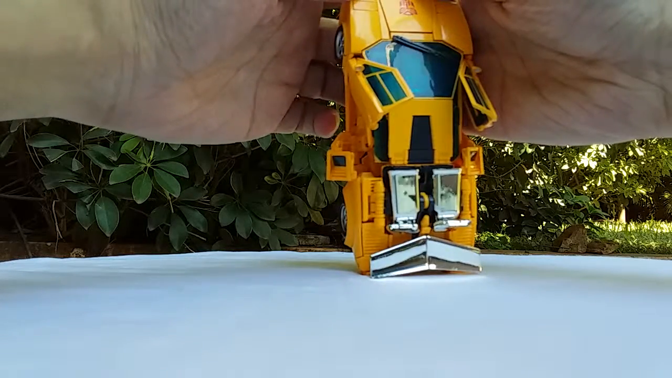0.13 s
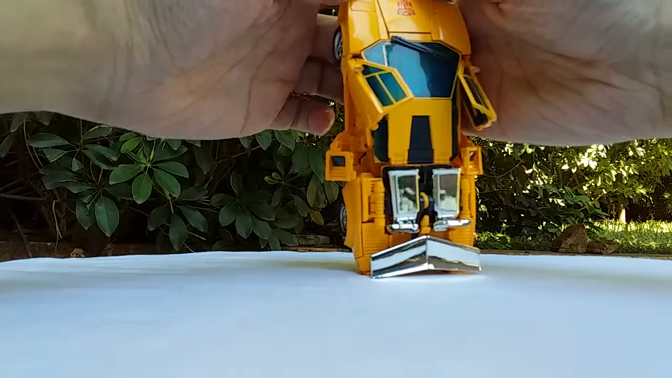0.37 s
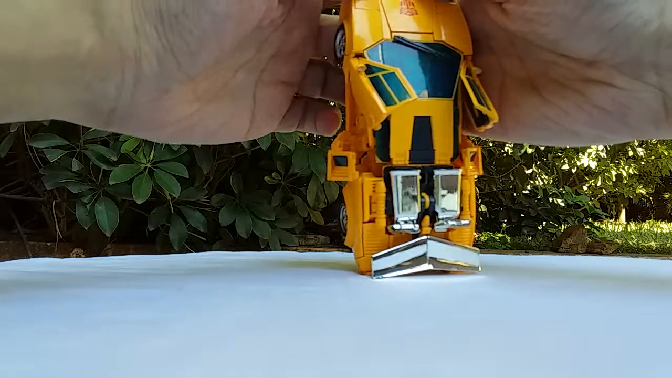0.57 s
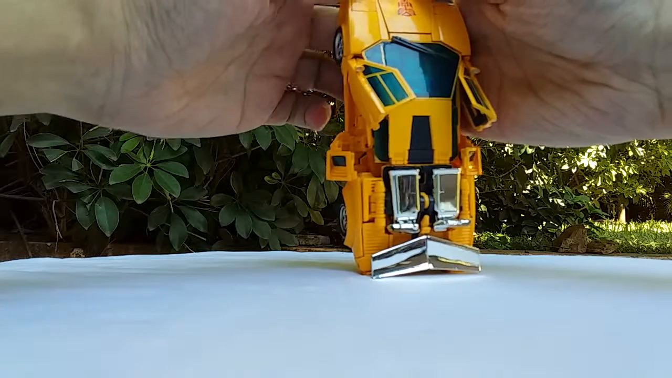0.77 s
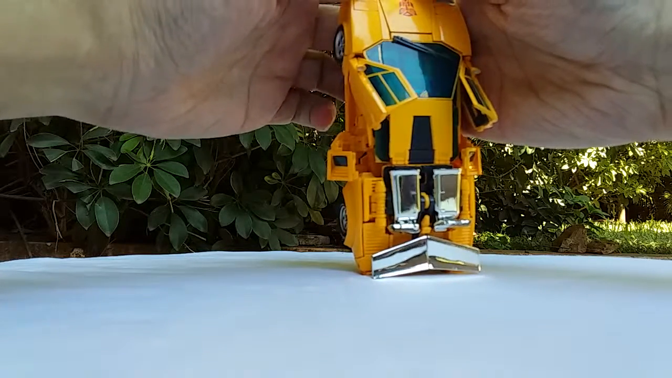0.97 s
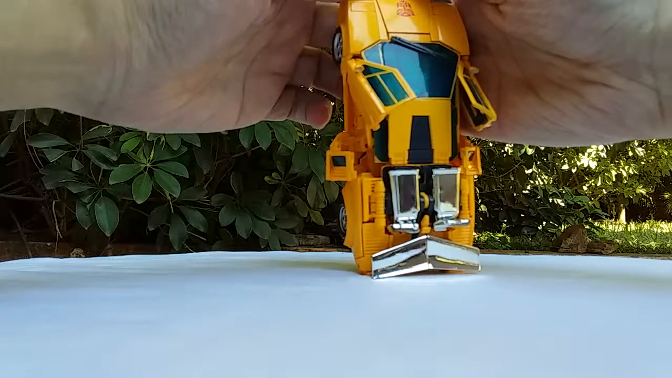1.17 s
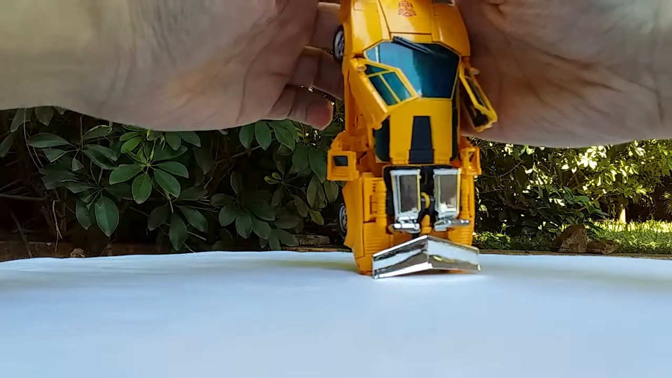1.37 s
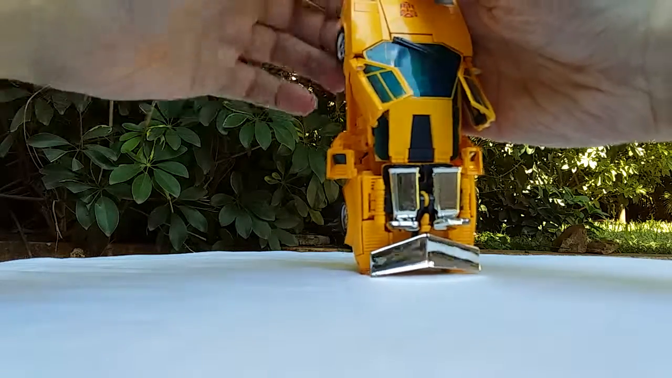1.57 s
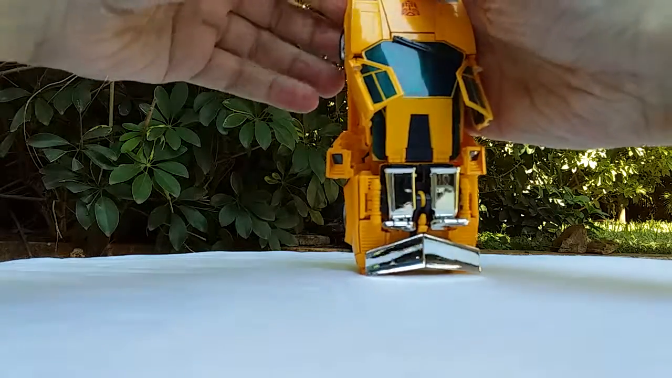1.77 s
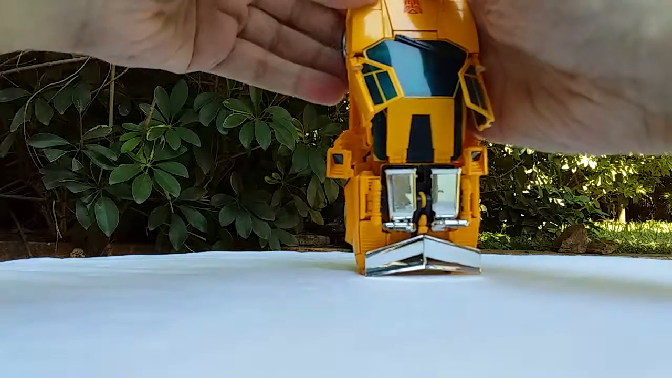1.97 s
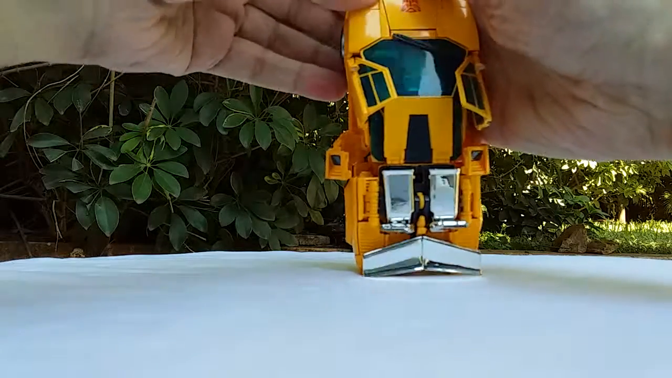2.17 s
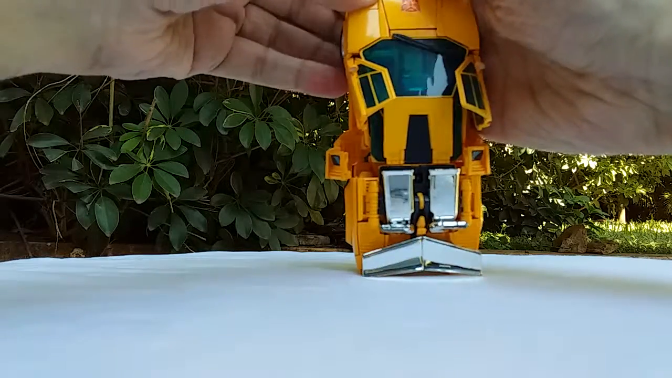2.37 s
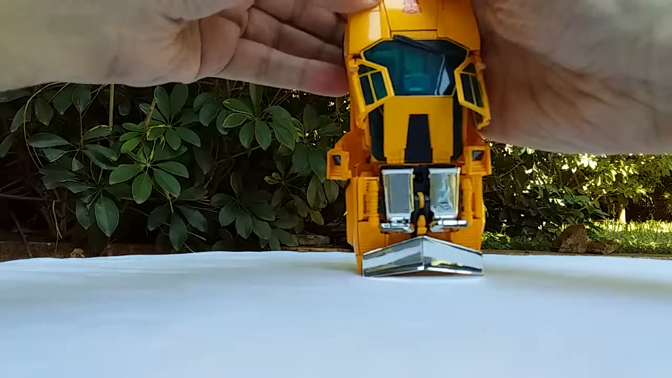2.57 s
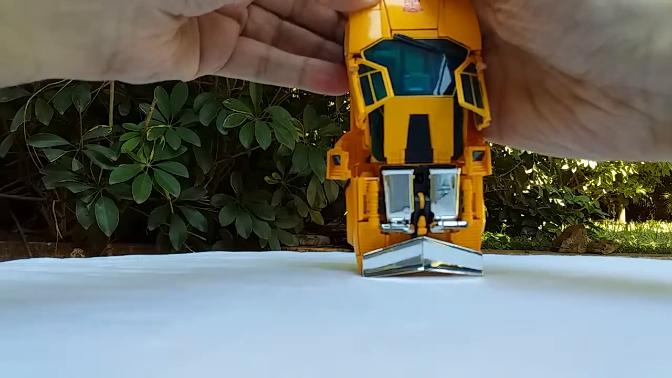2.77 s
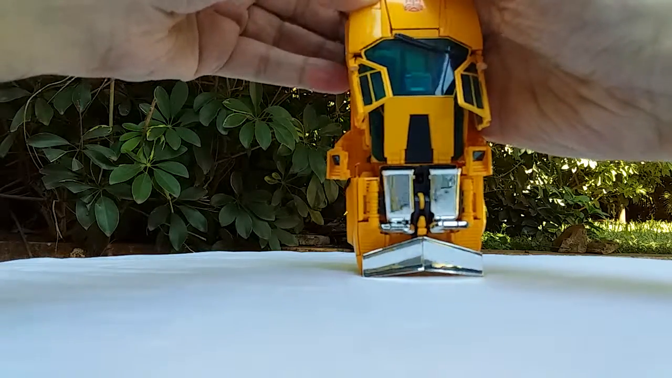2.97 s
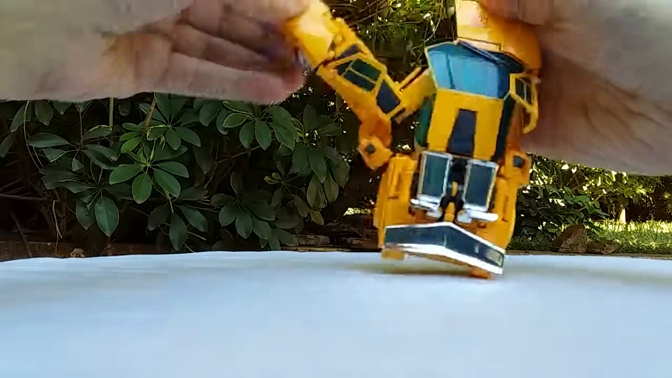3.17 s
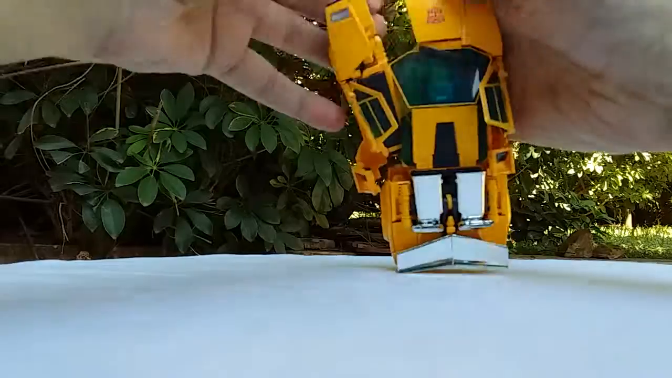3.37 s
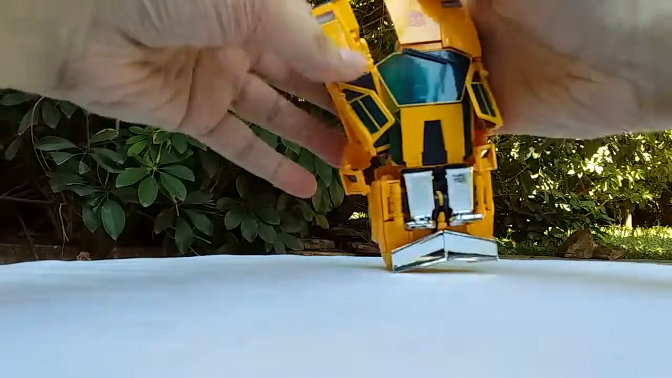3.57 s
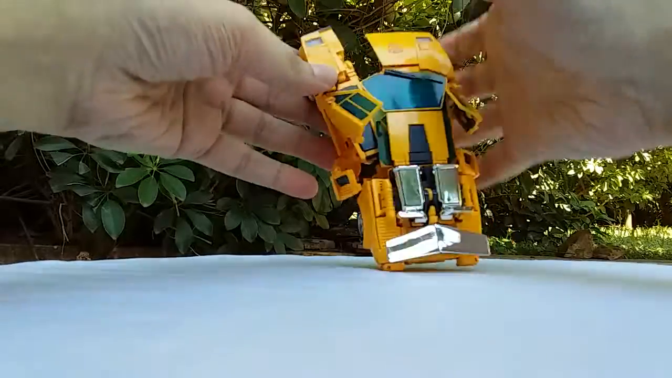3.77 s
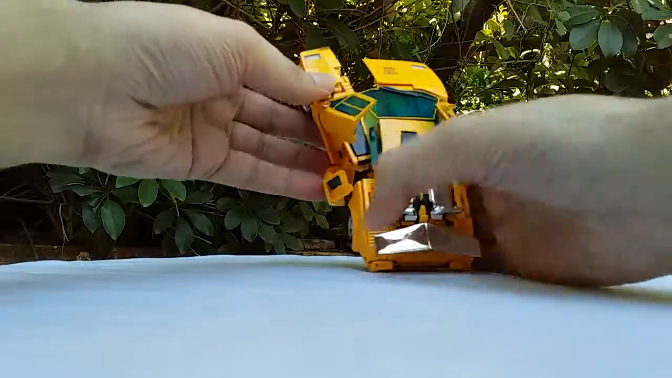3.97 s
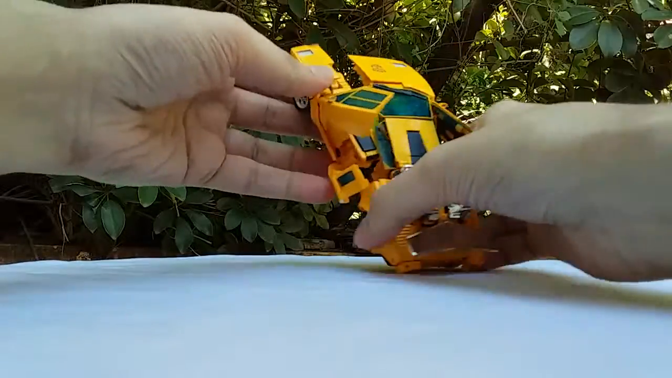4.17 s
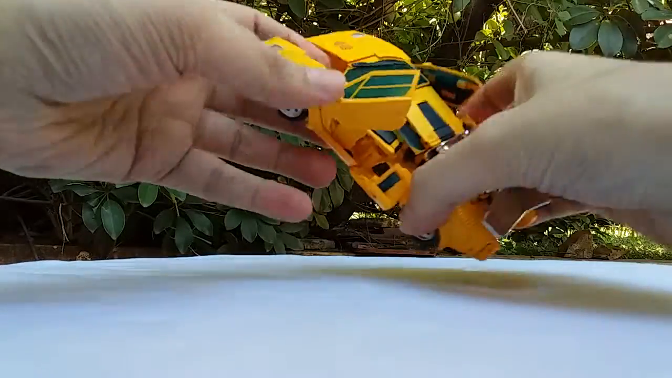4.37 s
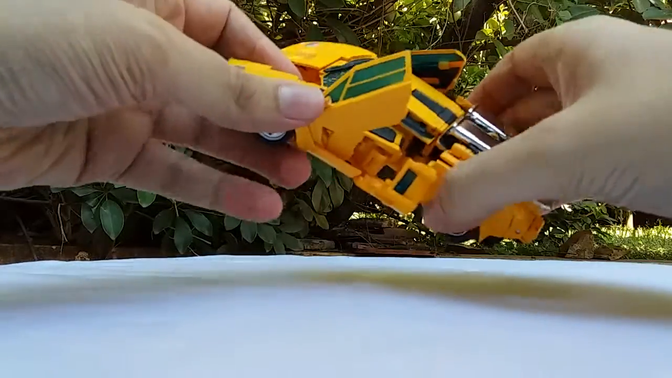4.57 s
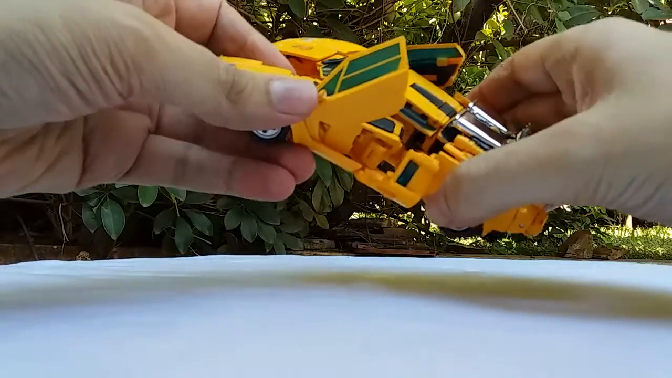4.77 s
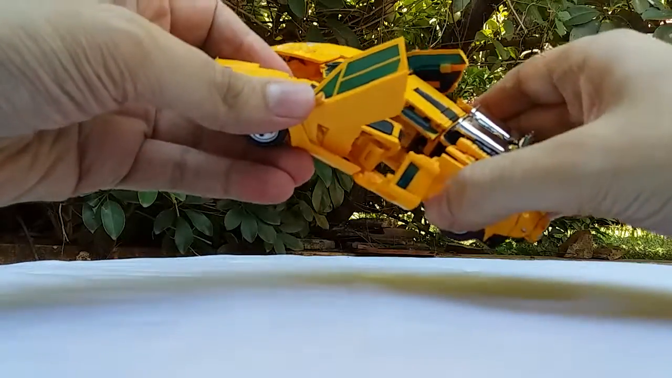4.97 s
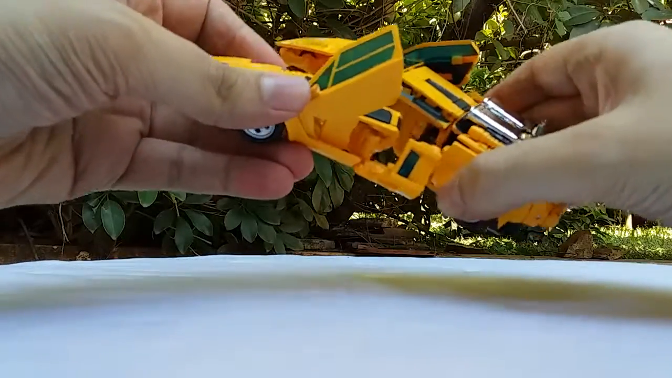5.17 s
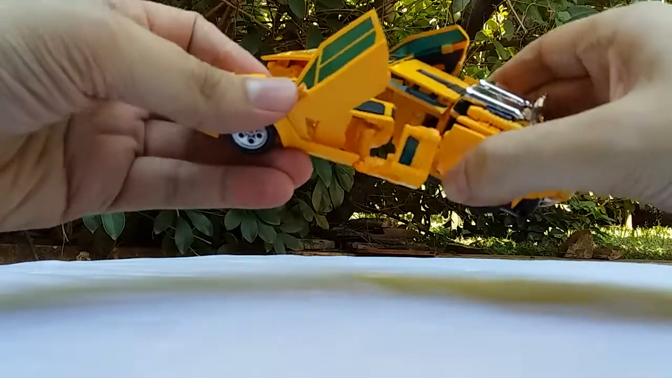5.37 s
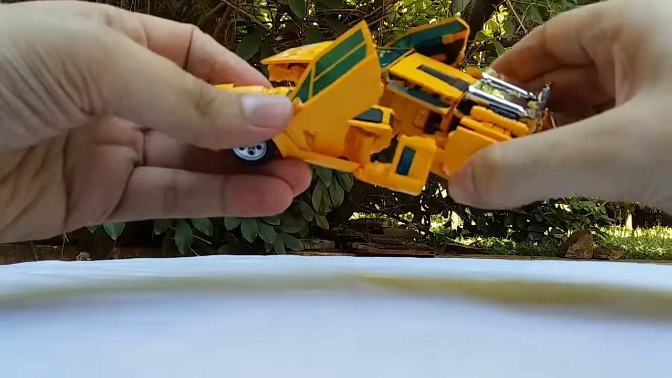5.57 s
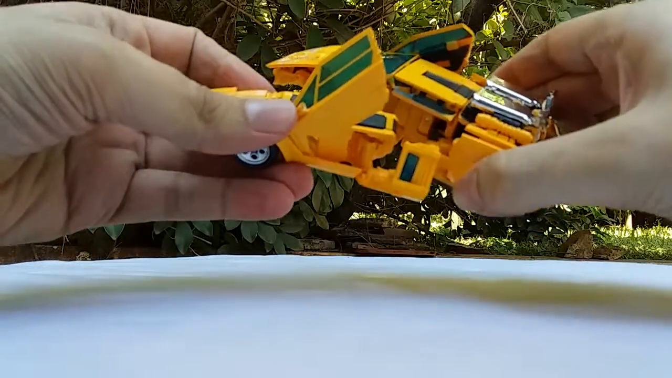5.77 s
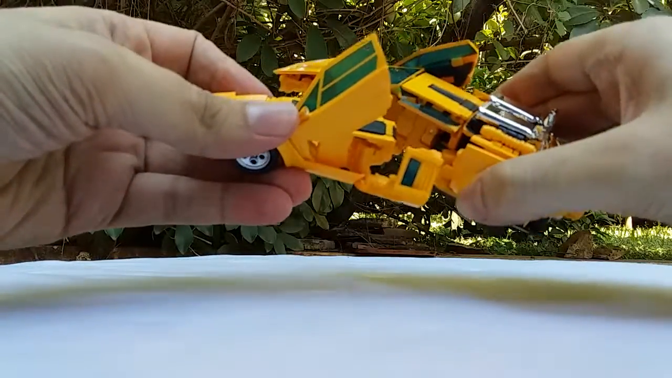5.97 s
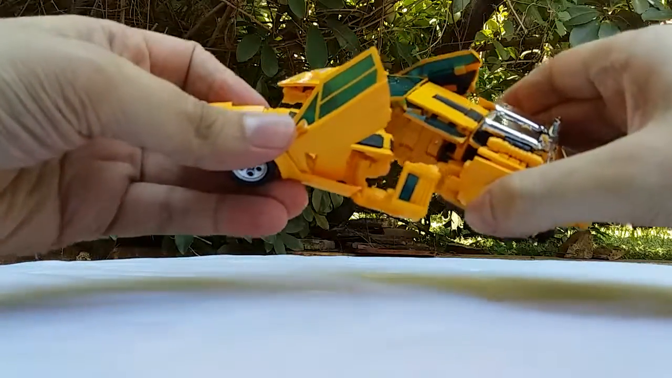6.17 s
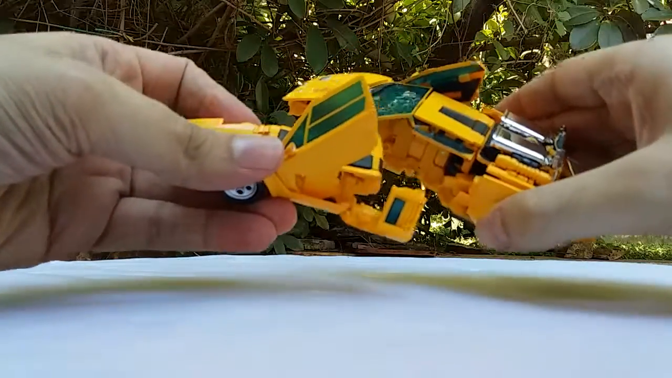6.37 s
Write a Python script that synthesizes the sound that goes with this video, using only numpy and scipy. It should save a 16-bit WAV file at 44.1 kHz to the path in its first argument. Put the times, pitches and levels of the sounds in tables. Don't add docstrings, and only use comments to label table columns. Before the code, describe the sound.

Plastic joints click and creak quietly, suddenly crack and rattle loudly against a table, then settle into light taps over faint traffic rumble.

```python
import sys
import numpy as np
from scipy import signal
from scipy.fft import rfft, irfft, next_fast_len
from scipy.io import wavfile
from scipy.ndimage import map_coordinates

SR = 44100
rng = np.random.default_rng(int(sys.argv[2]) if len(sys.argv) > 2 else 0)


def inscribe(sig):
    pcm = np.round(np.clip(np.atleast_2d(sig).T, -1, 1) * 32767)
    wavfile.write(sys.argv[1], SR, pcm.astype(np.int16))


def gain_from_db(level_db):
    decades = np.asarray(level_db, float) / 20
    return 10 ** decades


N = 283563


def unit(x):
    return x / np.sqrt(np.mean(x ** 2) + 1e-20)


def along(points, hz):
    point_hz, value = np.transpose(points)
    return np.interp(np.log(hz + 1), np.log(point_hz + 1), value)


def wobble(rate):
    knots = rng.standard_normal(int(N * rate / SR) + 4)
    return map_coordinates(knots, [np.arange(N) * rate / SR])


def filtered(x, response):
    size = next_fast_len(len(x) + 4096)
    spectrum = rfft(x, size) * response(np.fft.rfftfreq(size, 1 / SR))
    return irfft(spectrum, size)[:len(x)]


def resonances(modes):
    def response(f):
        total = 0
        for k, (hz, width, db) in enumerate(modes):
            total = total + (-1) ** k * gain_from_db(db) * 1j * f * width / (hz * hz - f * f + 1j * f * width)
        return total
    return response


def swells(rows):
    t = np.arange(N) / SR
    total = np.zeros(N)
    for s, hold, db, rise, fall in rows:
        before = np.clip(s - t, 0, None)
        after = np.clip(t - s - hold, 0, None)
        total += gain_from_db(db - rise * before - fall * after)
    return total


# (time [s], level [dB])
TRAFFIC_LEVEL = [(0, -55.5), (.9, -58.5), (2, -54.5), (2.8, -56.5), (3.5, -55.5), (3.8, -57), (4.1, -55),
                 (4.5, -58.5), (5.3, -56), (6.43, -56)]
# (frequency [Hz], level [dB per Hz])
RUMBLE_COLOUR = [(18, -33.5), (30, -14.5), (70, -4.5), (140, -0.5), (191, -3), (211, -10.5), (237, -7),
                 (385, -8.5), (415, -13), (446, -11.5), (494, -18.5), (779, -27), (1000, -35), (1300, -71),
                 (2200, -120)]
# (frequency [Hz], level [dB per Hz])
AIR_COLOUR = [(500, -16), (900, -5), (1320, 5), (1700, -2), (2400, -7), (4400, -6.5), (6500, -10),
              (10000, -12.5), (14000, -11), (15200, -7), (15850, -10), (16100, -38.5)]


def background():
    lumpy = rng.standard_normal(N) * gain_from_db(0.99 * wobble(25))
    rumble = unit(filtered(lumpy, lambda hz: gain_from_db(along(RUMBLE_COLOUR, hz))))
    time, level = np.transpose(TRAFFIC_LEVEL)
    traffic_db = np.interp(np.arange(N) / SR, time, level)
    rumble = gain_from_db(traffic_db + 0.57 * wobble(2.7)) * rumble

    drone_hz = 48 + 1.3 * wobble(3.8)
    drone = gain_from_db(-65.5 + 2.5 * wobble(7.1)) * np.sin(2 * np.pi * np.cumsum(drone_hz) / SR)

    air = unit(filtered(rng.standard_normal(N), lambda hz: gain_from_db(along(AIR_COLOUR, hz))))
    hiss = gain_from_db(-75.5 + 1.0 * wobble(1.4)) * air

    whine_hz = 14766 + 3 * wobble(4) + 7 * wobble(30)
    whine = gain_from_db(-73.0 + 0.95 * wobble(4.3)) * np.sin(2 * np.pi * np.cumsum(whine_hz) / SR)
    return rumble + drone + hiss + whine


# (start [s], hold [s], hiss level [dB], scrape level [dB])
FINGER_STROKES = [(.3, 0.061, -92, -85), (1.9, 0.023, -78, -80), (2.04, .2, -67.5, -81.5),
                  (2.404, 0.28, -72.5, -75), (3.443, .06, -77, -68.5), (3.62, 0.044, -77, -71),
                  (3.746, 0.046, -74.5, -73), (4.047, 0.33, -82, -78), (4.449, .15, -74.5, -85.5),
                  (4.698, 0.04, -74, -77), (4.861, 0.029, -76.5, -88), (5.3, 0.17, -82.5, -82),
                  (5.84, 0.033, -80.5, -78), (6.08, 0.037, -87, -87), (6.249, .12, -81.5, -83)]
# (frequency [Hz], width [Hz], level [dB])
SKIN_MODES = [(7400, 1000, 5), (8500, 1300, 3), (9890, 530, -2), (11400, 1400, -11)]
# (frequency [Hz], width [Hz], level [dB])
SHELL_MODES = [(3300, 400, -1), (3870, 1200, -3.5), (4700, 600, -3), (2200, 730, -4.5)]


def fingers():
    def rubbing(column):
        press, lift = 90.5, 127
        return swells([(row[0], row[1], row[column], press, lift) for row in FINGER_STROKES])

    fine_grains = rng.standard_normal(N) * gain_from_db(1.8 * wobble(240) + 1.2 * wobble(13))
    hiss = unit(filtered(fine_grains, resonances(SKIN_MODES)))
    coarse_grains = rng.standard_normal(N) * gain_from_db(3.5 * wobble(120) + 1.9 * wobble(20))
    scrape = unit(filtered(coarse_grains, resonances(SHELL_MODES)))
    hiss_gain = gain_from_db(-4.5) * (gain_from_db(-88.5) + rubbing(2))
    scrape_gain = gain_from_db(-3) * (gain_from_db(-85.5) + rubbing(3))
    return hiss_gain * hiss + scrape_gain * scrape


# (peak time [s], level [dB], fall [dB per s])
JOLTS = [(0.479, -60.5, 253), (1.237, -54.5, 256), (1.51, -63.5, 250), (3.136, -37, 360),
         (3.16, -46, 249.5), (3.178, -51, 243), (3.21, -55, 200), (3.278, -42.5, 304), (3.3, -23.5, 577),
         (3.33, -58, 196), (3.574, -59, 199), (3.901, -56.5, 300), (3.945, -53.5, 246), (4.69, -68, 200),
         (5.828, -71.5, 300)]


def rattle():
    grains = rng.standard_normal(N) * gain_from_db(4.5 * wobble(300))
    shaking = swells([(s, 0, db, 6000, fall) for s, db, fall in JOLTS])
    panel_modes = [(1315.4, 900, -8.0), (5500, 280, -6.5), (8200, 1500, -6.5), (12700, 2000, -19.5)]
    return shaking * unit(filtered(grains, resonances(SHELL_MODES + panel_modes)))


# (time [s], level [dB], hardness [Hz])
TABLE_PUSHES = [
    (3.1350, -35, 600),
    (3.175, -37, 714),
    (3.265, -17.5, 281),
    (3.2710, -22, 455),
    (3.302, -23.5, 1203),
    (3.317, -39, 1100),
    (3.4040, -33, 2000),
    (3.5800, -51.5, 820),
]
# (frequency [Hz], level [dB], time to fall 60 dB [s])
TABLE_MODES = [(70, -13, 0.21), (85, -7.5, .35), (118, 3.5, 0.069), (256, 0.5, 0.066), (313, -2.5, 0.059),
               (408, -9, 0.59), (484.2, -7.5, 0.2), (607.4, -15, 0.53), (665, -17, 0.5), (776, -19.5, .12),
               (875, -3.5, .05), (1010, -17, 0.11)]


def table():
    out, t = np.zeros(N + SR), np.arange(SR // 2) / SR
    onset = 1 - np.exp(-t / 0.0031)
    for s, db, hard_hz in TABLE_PUSHES:
        start = round(s * SR)
        for hz, level, t60 in TABLE_MODES:
            neighbour_hz = hz + rng.normal(0, 8)
            pair = np.sin(2 * np.pi * hz * t) + 1.1 * np.sin(2 * np.pi * neighbour_hz * t)
            reach = gain_from_db(db + level - 10.0 + rng.normal(0, 1)) / (1 + (hz / hard_hz) ** 2)
            out[start:start + len(t)] += reach * gain_from_db(-60 * t / t60) * onset * pair
    return out[:N]


# (frequency [Hz], time to fall 60 dB [s])
YARD_DECAY = [(500, .3), (2000, .35), (5000, .4), (9000, .4), (10500, .15), (14000, .1)]


def echo_tail():
    hz, t, z = signal.stft(rng.standard_normal(SR // 2), SR, nperseg=128)
    fade = gain_from_db(-60 * t / along(YARD_DECAY, hz)[:, None])
    tail = signal.istft(z * fade, SR, nperseg=128)[1]
    return tail / np.linalg.norm(tail)


# (time [s], peak level [dB], main ring [Hz], second ring [Hz])
BODY_BOOMS = [
    (1.2321, -45, 2320, 2010),
    (1.5041, -57, 1390, 2200),
    (3.1361, -39.5, 2050, 790),
    (3.1751, -38.5, 740, 1520),
    (3.2091, -44.5, 1636, 2068),
    (3.3018, -19, 1780, 1010),
    (3.4048, -25, 2413, 1950),
    (3.9421, -54, 1630, 2010),
]
# (time [s], peak level [dB], main ring [Hz], second ring [Hz], crack over rings [dB])
HARD_LATCHES = [(1.2316, -29, 4570, 7960, 12), (3.1348, -30, 5270, 11970, 10),
                (3.1359, -25.5, 3400, 11400, 4.5), (3.174, -25, 5200, 12950, 7),
                (3.1767, -29, 5250, 3300, -3.5), (3.1813, -32, 3200, 5400, -19),
                (3.2072, -34, 8000, 9300, 8.5), (3.2768, -26, 4060, 11010, 8),
                (3.2782, -29.5, 12060, 8027, 3), (3.2912, -29.5, 8500, 7105, 7),
                (3.2964, -17, 8300, 12400, 8), (3.3009, -12, 4230, 12800, 1),
                (3.3021, -10.5, 4230, 7800, 0), (3.3053, -20.5, 4200, 7640, 8),
                (3.3081, -19.5, 5000, 2139, -0.4), (3.3165, -12.5, 2340, 9094, 5),
                (3.319, -28.5, 4260, 7090, -0.5), (3.3257, -30.5, 3490, 7800, -7),
                (3.4045, -18, 4430, 8800, 3.5), (3.4809, -32, 3940, 8360, -42),
                (3.899, -33, 3410, 5280, -9), (3.9409, -31, 3400, 5000, -23),
                (3.949, -36, 7280, 10100, -19), (4.2898, -43, 6680, 4380, -14)]
# (time [s], peak level [dB], main ring [Hz], second ring [Hz])
JOINT_SNAPS = [(.4743, -39.5, 8050, 9440), (1.2897, -53, 4750, 8500), (1.3247, -42.5, 7800, 5660),
               (1.4845, -51.5, 5200, 6950), (1.5027, -44, 4050, 6860), (2.4952, -45, 9300, 7650),
               (2.903, -52, 7600, 5080), (3.082, -54.5, 7480, 11800), (3.0955, -48, 7400, 10900),
               (3.1105, -53, 7500, 11100), (3.142, -34, 3450, 8650), (3.1468, -28, 3380, 5240),
               (3.1866, -37, 8255, 5100), (3.2706, -40.5, 10940, 6230), (3.4604, -45.5, 4090, 8740),
               (3.573, -46, 4900, 3570), (3.9581, -45.5, 4550, 7540), (4.693, -51.5, 4030, 7560)]
# (time [s], peak level [dB], main ring [Hz], second ring [Hz])
PANEL_CLACKS = [(.479, -46, 8000, 4900), (.487, -48, 7850, 3870), (.5218, -48.5, 5500, 3900),
                (.7007, -52, 8770, 12140), (1.4753, -52, 2110, 4690), (1.5091, -54, 7950, 4320),
                (1.8864, -50, 4150, 7850), (2.6337, -49, 4300, 7400), (2.6548, -43, 8600, 4370),
                (2.6789, -49, 4540, 7700), (3.1977, -46, 4180, 2700), (3.2125, -41, 7160, 3072),
                (3.3972, -37, 4030, 7450), (3.4744, -46, 4390, 2670), (3.5848, -55, 5250, 8340),
                (3.6687, -45.5, 4780, 8600), (3.7053, -53.5, 3175, 4900), (3.9051, -50, 3400, 8630),
                (4.6223, -49.5, 4120, 12000), (4.6824, -46, 11880, 8700), (4.8442, -50, 7505, 15300),
                (6.0689, -48.5, 8460, 5293), (6.2372, -52, 8540, 5300)]
# (time [s], peak level [dB], main ring [Hz], second ring [Hz])
LIGHT_TAPS = [(.0694, -47, 8010, 5700), (.0772, -46.5, 8200, 5800), (.4834, -45.5, 7800, 5600),
              (2.6914, -54, 4470, 8140), (3.2269, -41, 3300, 5110), (3.2317, -45, 3250, 5260),
              (3.259, -47, 4940, 8005), (3.3625, -46, 3550, 2100), (3.4138, -42.5, 4800, 3120),
              (3.8946, -42.5, 8910, 3260), (3.926, -42, 8880, 5050), (3.9506, -42, 3500, 6360),
              (3.9946, -51, 3180, 7170), (4.2969, -50.5, 4310, 2190), (4.3119, -53.5, 4520, 6670),
              (4.3802, -56, 8040, 9980), (4.6867, -48, 4020, 11800), (3.2155, -42, 3300, 6900),
              (3.2215, -47, 3300, 6900), (4.6131, -54, 4050, 8620), (5.8248, -42, 8770, 4464)]
# (time [s], peak level [dB], ring [Hz])
SHELL_CREAKS = [(.0042, -60.5, 4820), (.2155, -57.5, 4000), (.233, -62, 2960), (.3773, -60, 4050),
                (.792, -63, 2490), (.86, -60, 2480), (.9073, -64, 2020), (.9154, -65, 2630),
                (1.0608, -60.5, 4560), (1.0798, -57, 5000), (1.1612, -68.5, 3170), (1.2184, -57, 1940),
                (1.5355, -69, 3150), (1.6854, -64, 4260), (1.831, -59.5, 4650), (1.8827, -57, 4050),
                (2.5016, -64, 5060), (2.5094, -63, 5000), (2.551, -60, 3840), (2.587, -59, 4100),
                (2.6014, -59, 2050), (2.8186, -64.5, 3150)]
# (time [s], peak level [dB], ring [Hz])
PANEL_TICKS = [(.3843, -56, 3110), (.6613, -68, 3940), (.6778, -59.5, 8150), (1.3083, -56, 5040),
               (2.2163, -58, 8170), (2.292, -58.5, 7160), (2.3113, -58, 7940), (2.3823, -62, 3190),
               (2.412, -60, 3340), (2.451, -62, 8100), (2.475, -58, 7860), (2.5777, -56, 3880),
               (2.9004, -61, 3302), (3.789, -58.5, 4570), (3.8187, -57, 3220), (4.0535, -52.5, 3450),
               (4.0606, -57, 3190), (4.0951, -65, 3420), (4.1393, -60, 3510), (4.2314, -62.5, 7860),
               (4.5807, -60.5, 7480), (4.633, -59, 4010), (4.8036, -60, 8470), (6.4077, -65.5, 7120)]


def contacts():
    panels = list(HARD_LATCHES)
    for rows, crack_db in ((JOINT_SNAPS, 6.5), (PANEL_CLACKS, 1.1), (LIGHT_TAPS, -2.5)):
        panels += [(*row, crack_db) for row in rows]
    for rows, middle_hz in ((SHELL_CREAKS, 3250), (PANEL_TICKS, 5400)):
        panels += [(s, db, hz, middle_hz * middle_hz / hz, -2.4) for s, db, hz in rows]
    panel_crack_hz, body_crack_hz = 6100, 1600
    cracks = [(*row, np.sqrt(row[2] * panel_crack_hz)) for row in panels]
    booms = [(*row, -6.5, np.sqrt(row[2] * body_crack_hz)) for row in BODY_BOOMS]
    return sorted(cracks + booms)


def clicks():
    near, walls = np.zeros(N + SR), np.zeros((6, N + SR))
    t = np.arange(SR // 12) / SR
    burst = (1 - np.exp(-t / 0.00014)) / (1 + (t / 0.0019) ** 6)
    fading = gain_from_db(-60 * t / .045) * (1 - np.exp(-t / .0005))

    def shell_colour(f):
        dull = 1 / (1 + (f / 9800) ** 12)
        dip = 1 - .5 / (1 + ((f - 6300) / 700) ** 2)
        return (dull + .1) * dip

    for k, (s, db, hz, second_hz, crack_db, crack_hz) in enumerate(contacts()):
        main_ring = np.sin(2 * np.pi * hz * t)
        second_ring = np.sin(2 * np.pi * (second_hz * t + rng.random()))
        rings = main_ring + gain_from_db(crack_db / 2 - 1.0) * second_ring

        broad = resonances([(crack_hz, .95 * crack_hz, 0)])
        crack = unit(filtered(burst * rng.standard_normal(len(t)), lambda f: broad(f) ** 2))
        snap = unit(burst * rings) + gain_from_db(crack_db - 5.5) * crack

        panels = resonances([(hz, 1200, 0), (second_hz, 1000, -3),
                             (crack_hz, 1.3 * crack_hz, crack_db - 3), (2400, 700, -6)])
        shell = unit(filtered(rng.standard_normal(len(t)), lambda f: panels(f) * shell_colour(f)))

        start = round(s * SR)
        near[start:start + len(t)] += gain_from_db(db + 4) * snap / np.max(abs(snap))
        near[start:start + len(t)] += gain_from_db(db - 13.5) * fading * shell
        late = start + 130
        walls[k % len(walls), late:late + len(t)] += gain_from_db(db - 25.5) * burst * shell
    return near[:N] + sum(signal.fftconvolve(wall, echo_tail())[:N] for wall in walls)


def scene():
    return (background() + fingers() + rattle() + table() + clicks())[None]


def low_pass(x):
    return signal.sosfilt(signal.butter(12, 16650, fs=SR, output="sos"), x)


def record(dry):
    def band(hz):
        return 1 / (1 + (40 / (hz + 1)) ** 20) / (1 + (hz / 15950) ** 120)
    mix = filtered(dry[0], band)[None]
    return low_pass(mix)


dry = scene()
out = record(dry)
inscribe(out)
```